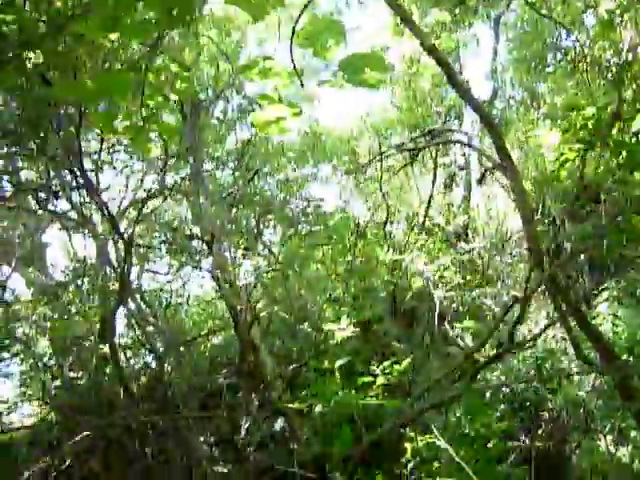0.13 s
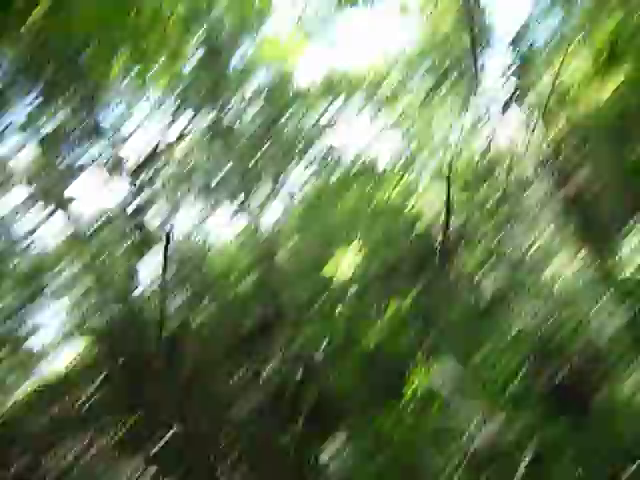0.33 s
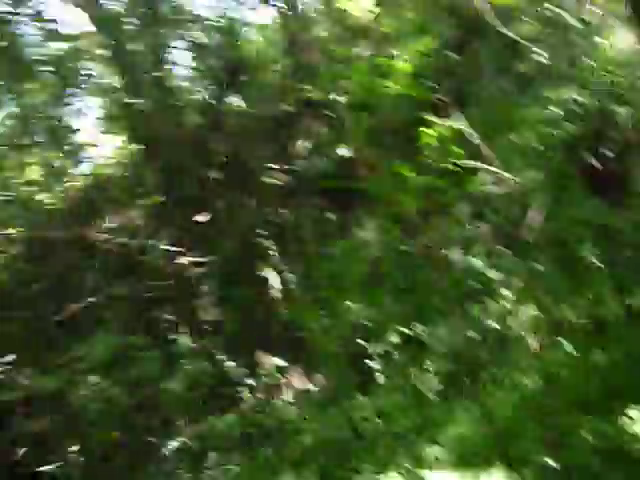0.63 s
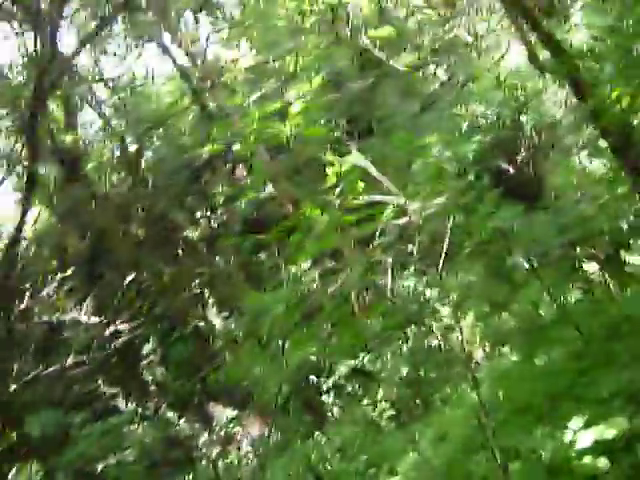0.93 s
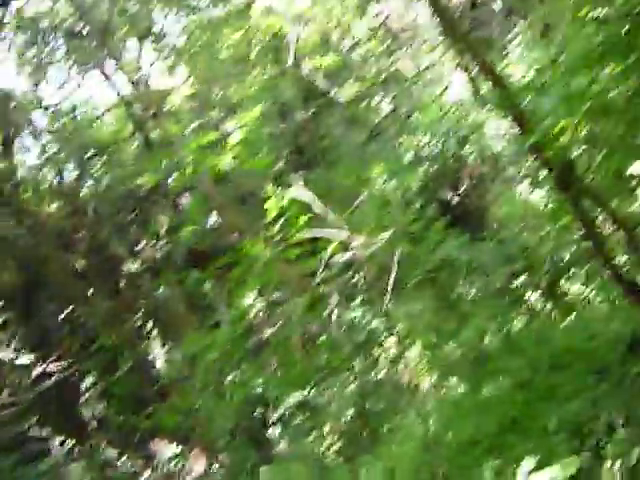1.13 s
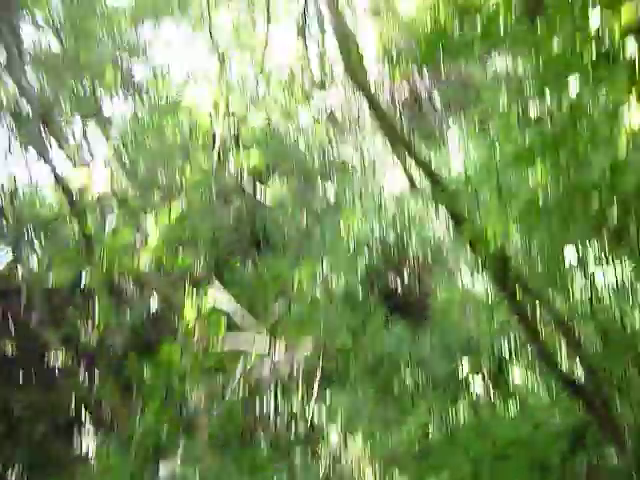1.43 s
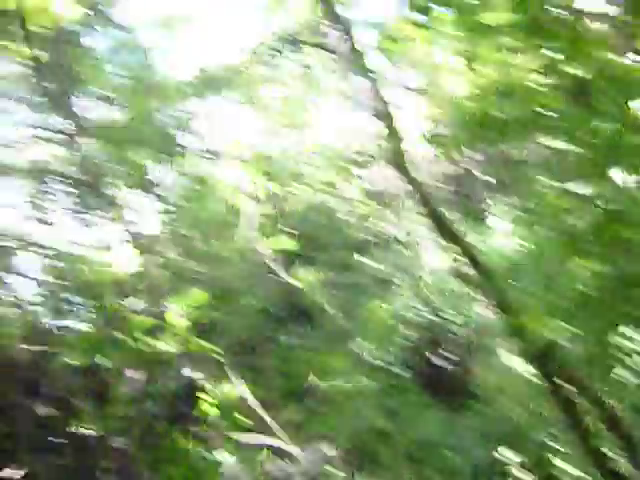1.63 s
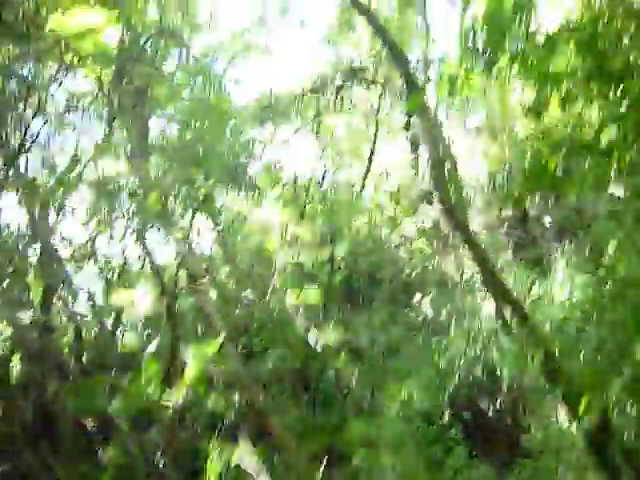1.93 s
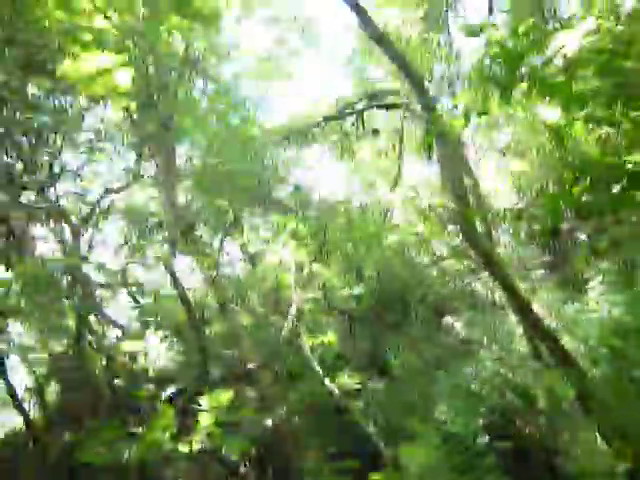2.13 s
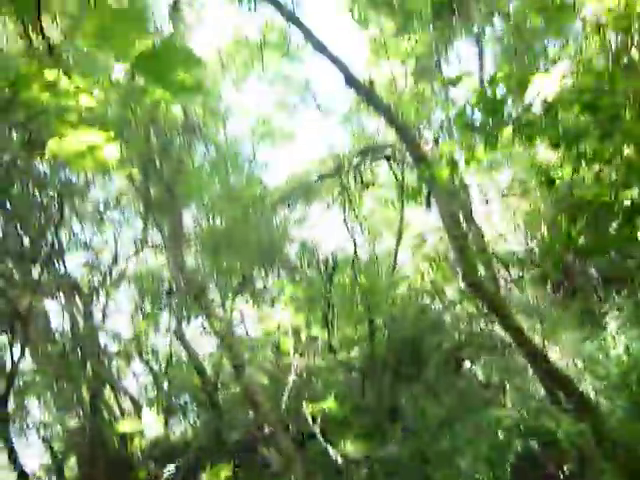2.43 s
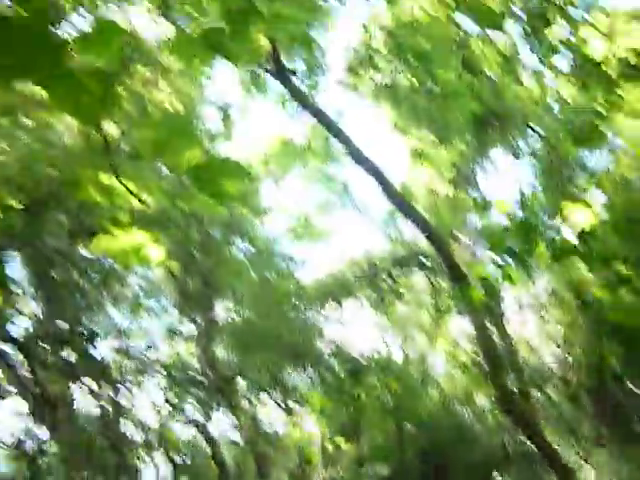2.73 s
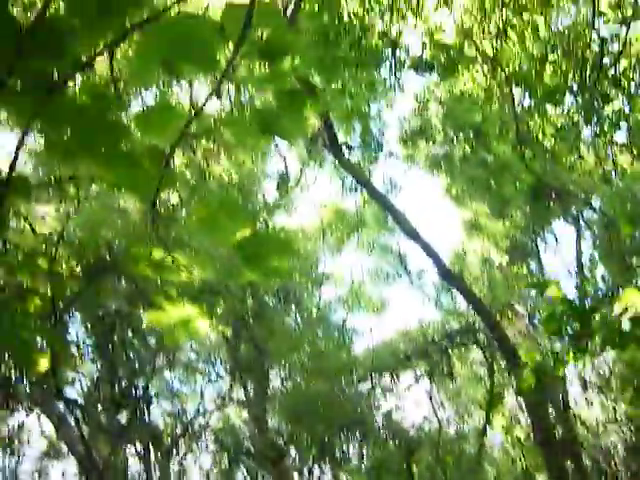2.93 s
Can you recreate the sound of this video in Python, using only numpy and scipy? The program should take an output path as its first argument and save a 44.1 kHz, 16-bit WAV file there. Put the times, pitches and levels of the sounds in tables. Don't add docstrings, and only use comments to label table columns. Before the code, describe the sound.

Hoarse, throaty howler monkey barks echo among trees while insects buzz and hands bump the recorder

```python
import sys
import numpy as np
from scipy import signal
from scipy.fft import rfft, irfft
from scipy.io import wavfile
from scipy.ndimage import uniform_filter1d

SR = 44100
rng = np.random.default_rng(int(sys.argv[2]) if len(sys.argv) > 2 else 0)


def volts(x):
    e = np.asarray(x, float) / 20
    return 10 ** e


def digitize_waveform(pressure):
    field = np.atleast_2d(pressure).T
    bounded = np.clip(field, -1, 1)
    quanta = np.round(bounded * 32767).astype(np.int16)
    wavfile.write(sys.argv[1], SR, quanta)


N = 135387


def rms_one(x):
    return x / np.sqrt(np.mean(x ** 2) + 1e-20)


def even(x):
    power = uniform_filter1d(x * x, size=int(0.025 * SR))
    return rms_one(x / (power + 1e-9) ** 0.25)


def in_time(rows):
    s, *columns = np.transpose(rows)
    return [np.interp(np.arange(N) / SR, s, c) for c in columns]


def drift(rate_hz, size=N):
    r = np.exp(-2 * np.pi * rate_hz / SR)
    wander = signal.lfilter([1], [1, -2 * r, r * r], rng.standard_normal(size + 9000))
    return rms_one(wander[9000:])


def peak(x, hz, wide_hz):
    r = np.exp(-np.pi * wide_hz / SR)
    poles = [1, -2 * r * np.cos(2 * np.pi * hz / SR), r * r]
    return signal.lfilter([(1 - r * r) / 2, 0, (r * r - 1) / 2], poles, x + 1e-18)


def peak_twice(x, hz, wide_hz, skirt_hz):
    return peak(peak(x, hz, wide_hz), hz, skirt_hz)


def resonances(x, rows):
    return sum(volts(db) * rms_one(peak_twice(x, hz, wide, 2 * wide)) for hz, wide, db in rows)


def cut(x, hz, kind, order=2):
    return signal.sosfilt(signal.butter(order, hz, kind, fs=SR, output="sos"), x)


def phase(hz):
    return 2 * np.pi / SR * np.cumsum(hz)


def pulses(hz):
    return np.diff(np.floor(np.cumsum(hz) / SR), prepend=0.)


def vocal_folds(pulse_hz, loose, noise):
    clicks = pulses(pulse_hz * np.exp(0.4 * loose * drift(60, size=len(loose))))
    alternate = (-1) ** np.cumsum(clicks)
    return rms_one(clicks * (1 + loose * (0.6 * noise[0] + alternate))) + loose * noise[1]


def throat_and_sac(source, throat_hz, sac_hz):
    upper_hz = 1.32 * throat_hz
    low = peak_twice(source, throat_hz, 100, 320)
    low = low + volts(-2) * peak_twice(source, 250, 47, 260)
    low = low - volts(-3) * peak_twice(source, upper_hz, 70, 140)
    high = peak_twice(source, sac_hz, 100, 260) - volts(-2.5) * peak_twice(source, 545, 81, 200)
    return [cut(cut(v, 210, "high", order=4), 1.12 * sac_hz, "low", order=6) for v in (low, high)]


def overtones(source, base_hz):
    n = len(source)
    ring = phase(base_hz + 9 * drift(30, size=n))
    out = 0
    for k, db in ((2, 3), (3, -8)):
        tone = volts(2.25 * drift(13, size=n)) * np.sin(k * ring)
        hiss = rms_one(peak_twice(source, k * base_hz, 73, 150))
        out = out + volts(db) * (tone + volts(-10) * hiss)
    return out


def bark(effort, voice, colour, ending, tones):
    # (frequency [Hz], width [Hz], level [dB])
    breath_peaks = [(5510, 180, -2.5), (5760, 180, 4), (6040, 200, 2), (6410, 220, -2.5)]
    # (frequency [Hz], width [Hz], level [dB])
    rasp_peaks = [(1167, 420, 0.2), (2050, 240, -4), (2730, 610, -8.5), (3480, 82, -8.5)]
    # (frequency [Hz], width [Hz], level [dB])
    nasal_peaks = [(2870, 80, -14.5), (3180, 60, -0.5), (3570, 54, -0.5), (3696, 100, -2)]
    pulse_hz, rough, clean_s, throat_hz, sac_hz = voice
    sac_db, over_db, throat_db, breath_db, squeak_db = colour
    pure_s, grate_db, over_hz, squeak_hz, squeak_fade_s = ending
    tone_s, throat_tone, sac_tone = np.transpose(tones)
    s, level_db, mouth_db = np.transpose(effort)
    first, n = int(s[0] * SR), int((s[-1] - s[0]) * SR)
    t = np.arange(n) / SR
    clock = t + s[0]
    level = volts(np.interp(clock, s, level_db))
    mouth = np.minimum(volts(np.interp(clock, s, mouth_db)), 0.97)

    loose = rough * np.clip(t / clean_s - 1, 0.1, 1)
    noise = rng.standard_normal((2, n))
    source = vocal_folds(pulse_hz, loose, noise)
    low, high = throat_and_sac(source, throat_hz, sac_hz)

    rasp = np.where(t > t[np.argmax(level)], (level / level.max()) ** 0.9, 1)
    rasp = rasp * (1 - 0.7 * (1 + np.tanh((t - pure_s) / 0.01)) / 2)
    throat_sing = np.sin(phase(np.interp(clock, tone_s, throat_tone) + 4.5 * drift(30, size=n)))
    sac_sing = np.sin(phase(np.interp(clock, tone_s, sac_tone) + 9 * drift(35, size=n)))
    low = even(rasp * rms_one(low) + volts(throat_db + 5 + 4.5 * drift(22.3, size=n)) * throat_sing)
    high = even(rasp * rms_one(high) + volts(sac_db + 6 + 4.5 * drift(24, size=n)) * sac_sing)
    skirts = rasp * sum(volts(-31) * rms_one(peak(source, hz, hz / 8.2)) for hz in (152, 994))

    over = overtones(source, over_hz)
    grate = even(resonances(source + noise[0], rasp_peaks))
    breath = rms_one(resonances(noise[1], breath_peaks))
    nasal = resonances(noise[1], nasal_peaks)
    squeak = even(peak_twice(noise[0], squeak_hz, 90, 90))

    swell = np.clip(t / 0.056, 0, 1)
    soft = level ** 0.65 * level.max() ** 0.31
    soft = soft * np.clip(t / 0.041, 0, 1) * np.clip((t[-1] - t) / 0.051, 0, 1)
    held = level.max() * np.clip((t - 0.018) / 0.012, 0, 1) * np.exp(-(t / squeak_fade_s) ** 4)
    voiced = np.sqrt(1 - mouth ** 2) * low + mouth * high + skirts
    voiced = voiced + swell * (volts(over_db) * rasp * over + volts(grate_db) * grate)
    airy = volts(breath_db) * rasp ** 0.4 * breath + volts(over_db - 15) * rasp ** 0.3 * nasal
    out = np.zeros(N)
    out[first:first + n] = level * voiced + soft * airy
    out[first:first + n] += volts(squeak_db + 3 * drift(40, size=n)) * held * squeak
    return out


def howler_monkey():
    # (time [s], level [dB], mouth opening as upper-resonance level [dB])
    efforts = [[(0.004, -27, -20.5), (0.036, -40.5, 5.5), (0.148, -50, -19), (0.165, -64.5, -3.5)], [(0.185, -52, -11.5), (0.203, -26, -6.5), (0.229, -20.5, -4),
                                (0.321, -20.5, -3.5), (0.346, -25.5, 4.5), (0.37, -21.5, -3.5),
                                (0.428, -42, 2.5), (0.49, -47.5, -7.5)], [(0.538, -52, -5), (0.556, -20.5, -5.5), (0.595, -18.5, -2),
                                                (0.66, -22, -5), (0.715, -26, 2), (0.735, -39.5, -4),
                                                (0.748, -30, -8.5), (0.8, -47.5, -7.5), (0.87, -57, -6)],
               [(0.944, -52, -3), (0.958, -25, -2.5), (1.003, -21, -9.5), (1.035, -19.5, -2),
                (1.06, -21.5, -12), (1.082, -18.5, -0.5), (1.13, -27, -0.5), (1.17, -29, -6.5),
                (1.27, -57, -8)], [(1.575, -48, -1), (1.609, -31, -2), (1.707, -22, -5), (1.727, -27, 5.5),
                                (1.745, -23, -3), (1.797, -33, -16), (1.863, -53, -5.5), (1.89, -82, -15)], [(2.095, -90, -20), (2.117, -34.5, -13), (2.189, -23, -4.5),
                                                (2.251, -21, -18), (2.273, -29.5, 5.5), (2.299, -25, -15),
                                                (2.347, -36, -15), (2.385, -39.5, -1)]]
    # (pulse rate [Hz], roughness [0-1], clean onset [s], throat [Hz], sac [Hz])
    voices = [(181, 0.7, 0.0012, 290, 705), (128.34, .7, .02, 312, 670), (285.6, .75, 0.027, 313, 692),
              (140.3, .5, 0.011, 332, 686), (122.5, .45, .01, 323, 670), (118.6, .28, 0.0087, 348, 663)]
    # (sac tone [dB], its overtones [dB], throat tone [dB], breath [dB], squeak [dB])
    colours = [(-11, -32.5, -4, -39.5, -58), (-7, -26.5, -3.5, -34.5, -49.5),
               (-3.5, -19.5, -3.5, -32, -48.5), (-5, -22.5, 0, -36, -38.5), (-10, -32, -13.5, -30.5, -31),
               (-10, -39, -2, -47, -36)]
    # (turns pure after [s], rasp [dB], overtone base [Hz], squeak [Hz], squeak fade [s])
    endings = [(0.033, -44, 700, 3850, .2), (0.14, -19, 700, 3850, .2), (.19, -30.5, 693, 3900, .2),
               (0.1, -33.5, 688, 3880, 0.24), (.2, -26, 708, 3790, .19), (0.16, -50.5, 680, 3890, .22)]
    # (time [s], throat [Hz], sac [Hz])
    tones = [
        [(0.004, 366.5, 735), (0.062, 349, 671), (0.08, 350, 719), (0.106, 321, 710), (0.122, 324, 682.5),
         (0.16, 325, 719.3)],
        [(0.19, 330.9, 619.8), (0.254, 367.4, 666.8), (0.282, 307.8, 616.4), (0.37, 353.7, 688.4),
         (0.382, 326, 698), (0.49, 358, 710)],
        [(0.54, 280.7, 676.3), (0.568, 291.4, 724), (0.588, 310, 682), (0.666, 317, 711), (0.702, 350.7, 698.9),
         (0.87, 343, 696)],
        [(0.945, 310, 734.5), (0.961, 278.5, 720), (0.993, 303, 681.8), (1.211, 341.5, 686.7),
         (1.231, 340, 661.2), (1.27, 277, 680)],
        [(1.58, 346.2, 626.5), (1.64, 315, 702.7), (1.718, 378, 651.5), (1.74, 325.6, 662), (1.85, 345.3, 645),
         (1.89, 298, 669.3)],
        [(2.1, 365, 616.7), (2.15, 360.7, 650.4), (2.282, 346.8, 648), (2.3, 315, 617), (2.33, 313, 685),
         (2.385, 321, 642)],
    ]
    return sum(bark(*row) for row in zip(efforts, voices, colours, endings, tones))


def canopy(x):
    t = np.arange(SR // 2) / SR
    tail = rng.standard_normal(len(t)) * volts(-60 * t / 0.41)
    return volts(-11.5) * signal.fftconvolve(x, tail / np.sqrt(np.sum(tail ** 2)))[:N]


def cicada():
    # (time [s], level [dB])
    loudness = [(0, -61.5), (.4, -55.5), (.8, -58), (1.2, -58.5), (1.42, -54), (1.62, -57), (1.9, -53.5),
                (2.2, -55.5), (2.6, -53.5), (3.07, -53)]
    # (time [s], dip [dB])
    rests = [(.5, -3), (.855, -7.5), (1.257, -8.5), (1.635, -6.5), (1.99, -1.5), (2.66, -4.5)]
    rest_s, fade = 0.02, 0.984
    t = np.arange(N) / SR
    rate = 182 * (1 + 0.027 * drift(11))
    throb_db = 5 * np.sin(phase(rate / 3))
    clicks = pulses(rate) * volts(throb_db + 2.5 * rng.standard_normal(N))
    gate = signal.lfilter([1], [1, -2 * fade, fade ** 2], clicks)
    chorus = volts(-7) * rng.standard_normal(N)
    song = rms_one(gate) * rng.standard_normal(N) + chorus
    song = peak(sum(peak(song, hz, 450) for hz in (7580, 7936)), 7980, 1100)
    dips = 0
    for s, db in rests:
        side_s = np.where(t < s, 1.5 * rest_s, rest_s / 2)
        dips = dips + db * np.exp(-((t - s) / side_s) ** 2)
    return volts(in_time(loudness)[0] + dips + drift(11)) * rms_one(song)


def handling():
    # (time [s], peak [dB], low edge [Hz], high edge [Hz], length [s])
    taps = [(.173, -34.5, 400, 2000, 0.0095), (.173, -44, 2400, 4200, .009),
            (0.339, -49, 4400, 8050, 0.00086), (0.37, -43.5, 900, 7000, 0.0017),
            (.502, -28.5, 1080, 1450, 0.004), (.502, -46.5, 2500, 4600, .002),
            (0.935, -46, 1200, 2600, 0.0021), (1.17, -35, 650, 1600, 0.00089),
            (1.196, -35, 1000, 2170, 0.0014), (1.228, -45, 1200, 1700, .002),
            (1.412, -37, 300, 2310, 0.0076), (1.534, -46, 2970, 4400, 0.0025),
            (1.699, -39, 2020, 3000, .002), (1.727, -37, 1620, 4000, 0.0032),
            (1.85, -38.5, 710, 1150, 0.0034), (2.387, -32, 890, 1500, 0.00088),
            (2.395, -32, 1100, 2450, 0.00033), (2.3985, -27, 680, 1070, 0.003),
            (2.397, -27, 110, 464, 0.0082), (2.4, -33.5, 500, 2280, 0.021),
            (2.394, -44.5, 2500, 7560, 0.014), (2.612, -29.5, 480, 833, 0.0026),
            (2.719, -31.5, 545, 1460, 0.0009), (2.723, -35.5, 200, 497, 0.0034),
            (2.753, -37, 600, 1100, 0.001), (2.766, -36, 597, 1270, 0.00089), (2.795, -40, 700, 2800, .004),
            (2.802, -33, 600, 1580, .001), (2.8355, -30, 690, 1980, .001), (2.839, -29.5, 500, 1900, .004),
            (2.884, -38.5, 600, 7500, .0005), (2.905, -49, 1000, 7000, .0005),
            (2.926, -45, 700, 2280, 0.003)]
    # (time [s], level [dB])
    rubbing = [(0, -86), (1.3, -61), (1.55, -50), (1.9, -52), (2.1, -54.5), (2.33, -47.5), (2.45, -61),
               (2.75, -51), (2.85, -54), (3.07, -66.5)]
    out, t = np.zeros(N + SR), np.arange(SR // 20) / SR
    for s, db, low_hz, high_hz, length in taps:
        strike = np.where(t == 0, volts(14), rng.standard_normal(len(t)))
        burst = strike * np.exp(-(t / length) ** 2)
        body = cut(burst, [low_hz, high_hz], "band", order=3)
        start = int(s * SR)
        out[start:start + len(t)] += volts(db) * (body / np.abs(body).max() + volts(-22) * burst)
    struck = rng.random(N) < 1800 * volts(4 * drift(20)) / SR
    grains = struck * rng.standard_normal(N) * volts(rng.exponential(1, N))
    rub = rms_one(cut(cut(grains, 1500, "low"), 120, "high"))
    return out[:N] + volts(in_time(rubbing)[0]) * rub


def hoot():
    # (time [s], pitch [Hz], level [dB])
    call = [
        (2.421, 630, -49),
        (2.71, 591, -56.5),
        (2.754, 590, -62),
        (2.76, 630.3, -71),
    ]
    before = (call[0][0] - 0.03, call[0][1], -99)
    after = (call[-1][0] + 0.021, call[-1][1], -99)
    hz, db = in_time([before] + list(call) + [after])
    return np.sqrt(2) * volts(db + 1.5 * drift(18)) * np.sin(phase(hz))


def hush():
    # (frequency [Hz], density [dB per Hz])
    spectrum = [(40, -29), (70, -21), (150, -14.5), (318, -9.5), (395, -13.5), (491, -12.5), (842, -18),
                (1120, -24), (7000, -34.5), (9100, -83)]
    hz, db = np.transpose(spectrum)
    f = np.maximum(np.fft.rfftfreq(N, 1 / SR), 1)
    shape = volts(np.interp(np.log(f), np.log(hz), db)) * np.minimum(f / 60, 1) ** 2
    noise = irfft(rfft(rng.standard_normal(N)) * shape, N)
    return volts(-51.5 + drift(1.6)) * rms_one(noise)


def finger(air):
    t = np.arange(N) / SR
    covered = uniform_filter1d(((t > 0.149) & (t < 0.372)) * 1., size=60)
    return (1 - covered) * air + covered * volts(-2) * cut(air, 3400, "low", order=4)


def scene():
    monkey = howler_monkey()
    air = monkey + canopy(monkey) + hoot() + cicada() + hush()
    return (finger(air) + handling())[None]


def band_limit(x):
    return signal.sosfilt(signal.butter(12, 8740, fs=SR, output="sos"), x)


def record(dry):
    x = dry + volts(-64) * rng.standard_normal(dry.shape)
    low_pass = signal.cheby2(14, 70, 9450, fs=SR, output="sos")
    mix = signal.sosfilt(low_pass, x) - 0.0507
    return band_limit(mix)


dry = scene()
out = record(dry)
digitize_waveform(out)
```